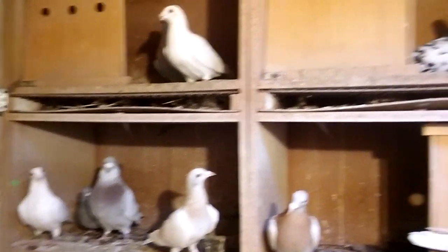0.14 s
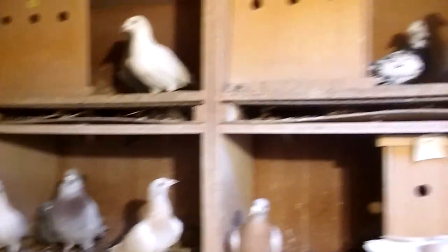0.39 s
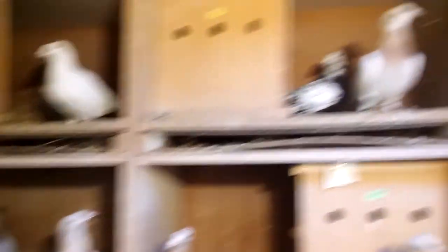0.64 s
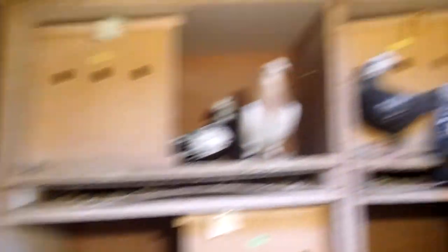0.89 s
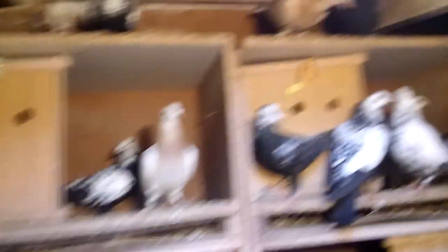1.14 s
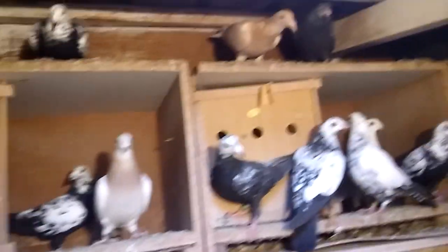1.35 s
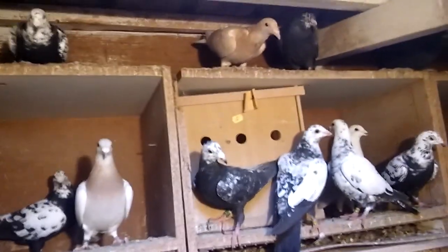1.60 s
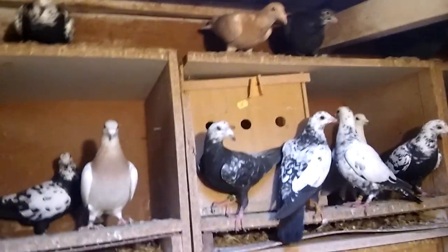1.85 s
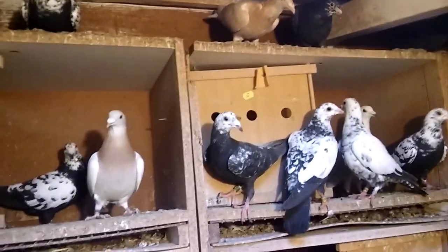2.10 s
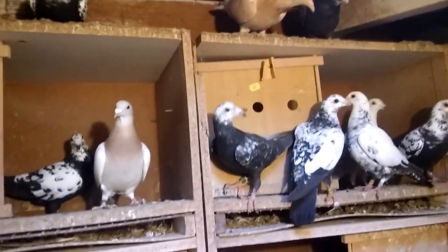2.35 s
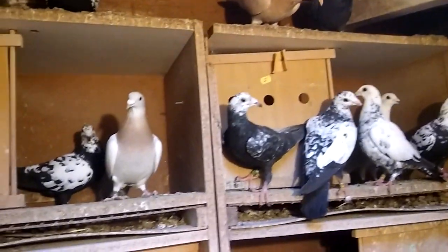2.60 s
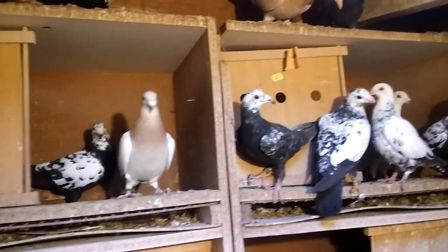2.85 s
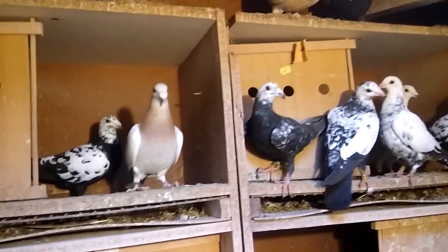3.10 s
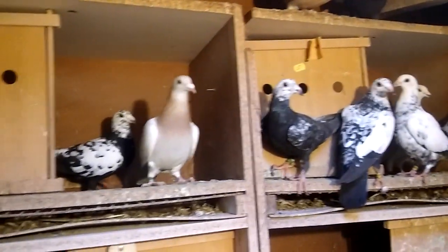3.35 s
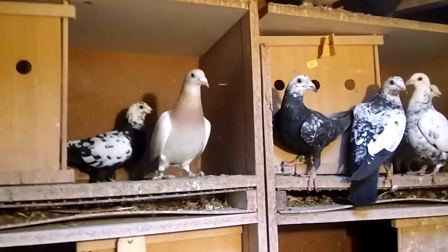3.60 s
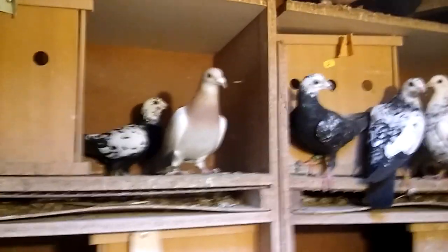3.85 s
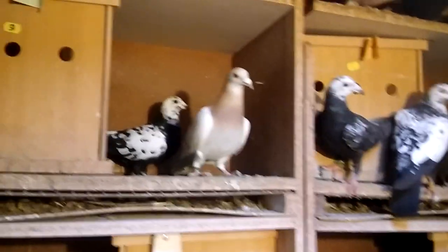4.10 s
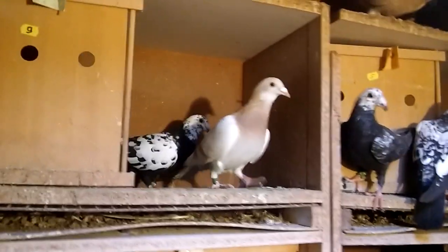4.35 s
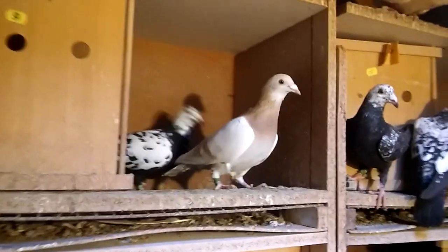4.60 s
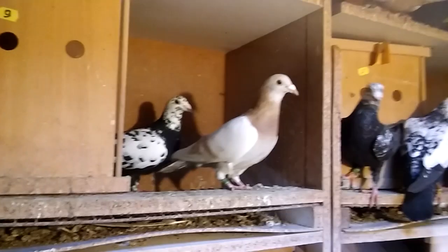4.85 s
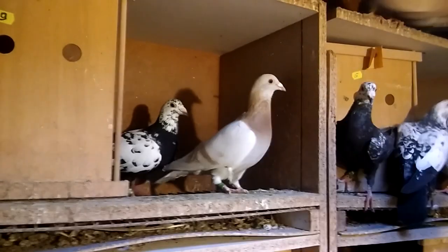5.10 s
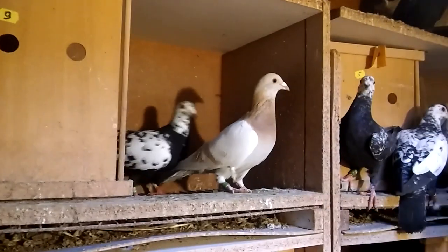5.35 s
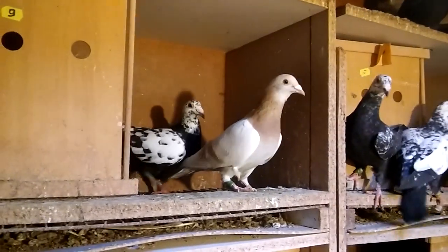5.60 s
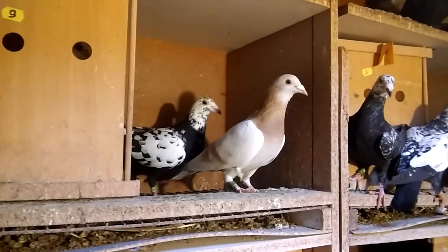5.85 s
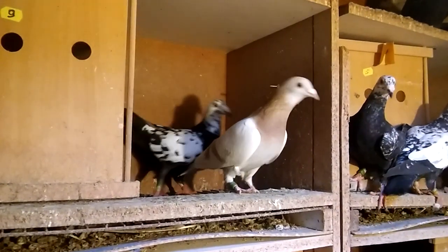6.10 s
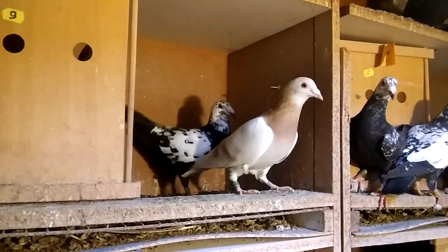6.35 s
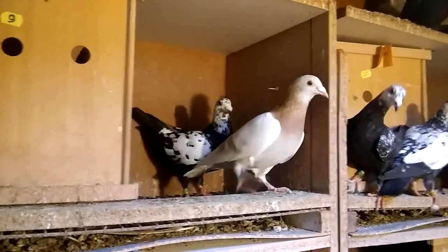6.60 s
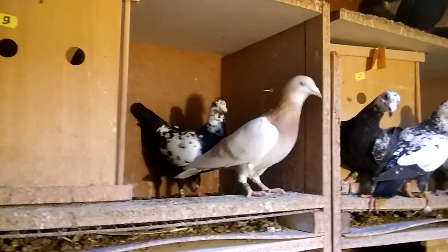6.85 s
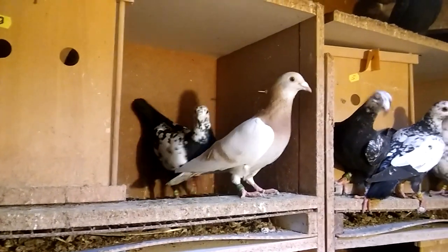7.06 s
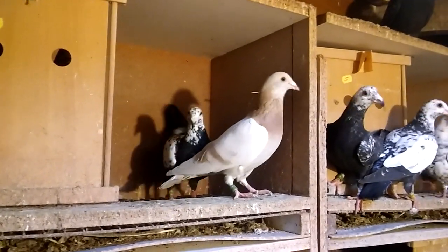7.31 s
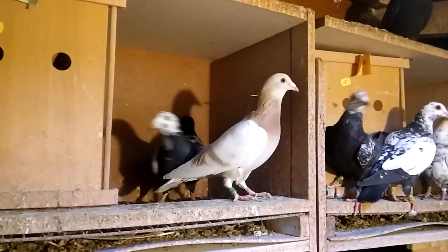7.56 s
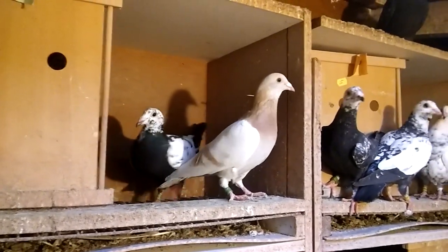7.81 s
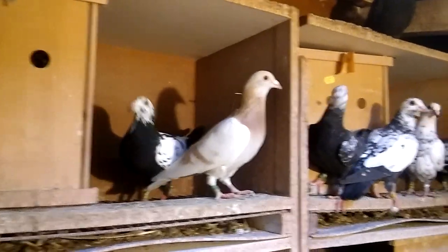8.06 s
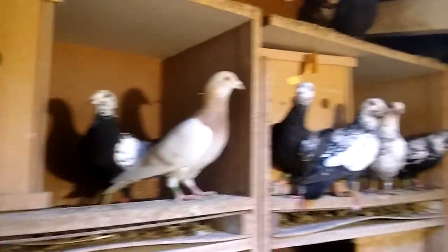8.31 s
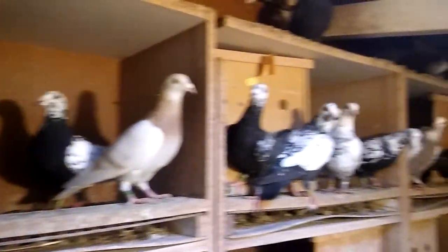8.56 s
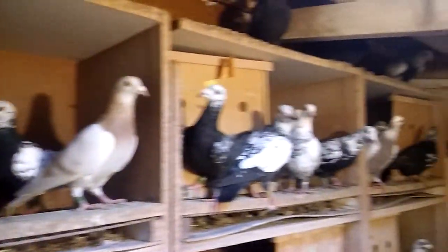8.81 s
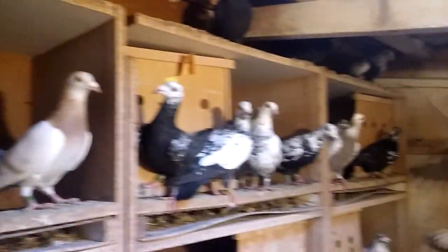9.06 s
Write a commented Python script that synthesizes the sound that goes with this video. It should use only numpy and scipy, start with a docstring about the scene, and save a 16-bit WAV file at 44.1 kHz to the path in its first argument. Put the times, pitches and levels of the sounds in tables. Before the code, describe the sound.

Claws tap and feathers rustle on wooden shelves with faint coos, a sudden heavy board clatter midway, another flutter, then near quiet.

```python
"""Pigeons in a small wooden loft. From the start, claws and wing tips tap and scuff on the boards as gritty
noise bursts, over birds stirring as wavering noise bands. Early on come a few soft coos, sung as gliding sines,
and a bird fluttering past in even low pulses. Midway a bird landing close by makes a loose board bang and
bounce as a set of ringing modes; a second flutter passes. Late on, distant hollow knocks ring."""
import sys
import numpy as np
from scipy import signal
from scipy.fft import rfft, irfft
from scipy.io import wavfile
from scipy.ndimage import uniform_filter1d, map_coordinates

SR = 44100
rng = np.random.default_rng(int(sys.argv[2]) if len(sys.argv) > 2 else 0)


def ratio_of_db(decibels):
    """Turn decibels (scalar or array-like) into linear amplitude factors; 0 dB maps to 1."""
    return 10 ** (np.asarray(decibels, float) / 20)


def inscribe(sig):
    """Save sig as 16-bit PCM at rate SR to the path in sys.argv[1].

    A 1-D sig is mono; a 2-D sig holds one channel per row.
    Samples are clipped to [-1, 1] before scaling.
    """
    pcm = np.round(np.clip(np.atleast_2d(sig).T, -1, 1) * 32767)
    wavfile.write(sys.argv[1], SR, pcm.astype(np.int16))


N = 405279

# taps and scuffs on the boards: (t/s, peak level/dB, treble level/dB re middle band, t60/s)
TAPS = [(0.073, -48.5, 1, 0.23), (0.297, -37.5, -2, 0.22), (0.347, -37.5, -7, 0.26),
        (0.379, -36.5, -6.5, 0.23), (0.4354, -40, 0, 0.27), (0.742, -45, 1.5, 0.31),
        (0.845, -44.5, -5, 0.12), (0.894, -53, 3, 0.8), (1.046, -37, 0, 0.14), (1.121, -51, 4, 0.13),
        (1.163, -34.5, -5.5, 0.18), (1.286, -37, 0, 0.46), (1.428, -23.5, 1.5, 0.15),
        (1.6397, -19, 2, 0.16), (1.747, -34, -4.5, 0.24), (2.0716, -41, 2, 0.16),
        (2.426, -53.5, -2.5, 0.81), (2.6447, -41, -7, 0.25), (2.734, -47.5, 6.5, 0.23),
        (2.803, -51, 9, 0.13), (2.868, -50.5, 2, 0.39), (2.925, -53.5, 10, 0.12), (3.101, -48, 4.5, 0.29),
        (3.315, -47, 2.5, 0.23), (3.352, -50.5, -3.5, 0.39), (3.48, -49, 4.5, 0.22), (3.529, -48, -4, 0.46),
        (3.599, -41, 5, 0.31), (3.734, -56, 9.5, 0.47), (3.872, -42, -1.5, 0.3), (3.9535, -51, 0, 0.39),
        (4.147, -56, 11, 0.41), (4.284, -54.5, 4.5, 0.56), (4.376, -53, 5, 0.38), (4.4706, -34, -1.5, 0.87),
        (4.7888, -24, -3, 0.035), (4.975, -30, -8, 0.25), (5.085, -32.5, -9, 0.048),
        (5.237, -33, -2.5, 0.044), (5.396, -25.5, -7, 0.29), (5.532, -22.5, -3, 0.17),
        (5.588, -25, -6, 0.18), (5.68, -29.5, -1.5, 0.13), (6.089, -31.5, -7, 0.14),
        (6.354, -40.5, 9.5, 0.13), (6.461, -43, -3.5, 0.67), (6.51, -49.5, 12, 0.08),
        (6.559, -39.5, -2, 0.42), (6.727, -40, -12.5, 0.095), (6.82, -36, 0.5, 0.25),
        (7.193, -53, 2.5, 0.4), (8.313, -51, -4, 0.23), (8.136, -63, 12, 0.29), (8.282, -60, 10, 0.35),
        (8.588, -69, 19, 0.29), (8.861, -55.5, 4, 0.6), (8.999, -31, 2, 0.19)]
TAP_BODY_DB, TAP_TINT_DB, FIRM_TAP_DB = -8, 5, -30
RISE_SHARE, SLOWER_RISE = 0.02, 0.12  # rise of a firm tap as a share of its t60; dB longer per dB fainter
AIRIER = 0.26  # dB more top treble per dB fainter: brushed feathers swish


def taps():
    """Each tap is a burst of gritty noise; long and faint ones are brushed and rise more slowly."""
    power, t = np.zeros((4, N)), np.arange(SR // 2) / SR
    for start, peak_db, treble_db, t60 in TAPS:
        at, fainter_db = int(start * SR), FIRM_TAP_DB - peak_db
        fade = ratio_of_db(peak_db - 8 - 60 * t / t60)  # noise peaks stand about 8 dB over its rms
        rise_s = RISE_SHARE * t60 * ratio_of_db(SLOWER_RISE * fainter_db)
        fade *= np.minimum(t / rise_s, 1)
        body_db = TAP_BODY_DB - 0.5 * treble_db + 0.15 * fainter_db
        air_db = treble_db - 12 + AIRIER * fainter_db
        band_gain = ratio_of_db(np.array([[body_db], [0], [treble_db], [air_db]]))
        power[:, at:at + len(t)] += (band_gain * fade[:N - at]) ** 2
    grit = ratio_of_db(drift(350))  # uneven contact within a scuff
    body, middle, treble, air = np.sqrt(power) * grit
    out = body * zone(180, 1500, TAP_TINT_DB) + middle * zone(1000, 4900, TAP_TINT_DB)
    return out + treble * zone(3500, 12000, TAP_TINT_DB) + air * zone(8500, 20000)


# claws catching on a shelf edge: (t/s, peak level/dB)
CLAWS = [(0.899, -51), (1.1225, -49), (1.2915, -41), (2.427, -48), (2.8695, -52)]


def claws():
    """A claw catches abruptly and grates in two bands of noise."""
    s, peak_db = np.transpose(CLAWS)
    return fading(click_train(s, ratio_of_db(peak_db)), 0.15) * (zone(1900, 3000) + zone(4900, 6800))


# blows on the loose board: (t/s, swing level/dB, ring level/dB, crack level/dB, pitch ratio of the ring);
# the ratio is higher where the board is held down
BLOWS = [(4.506, -26, -18, -19, 1.15), (4.512, -40, -21, -24, 1.19), (4.5774, -29, -36, -23, 1.05),
         (4.62, -40, -42, -34, 1.2), (4.7206, -32, -22, -26, .95), (4.723, -6, -21.5, -26, 1.08),
         (4.7346, -34.5, -26, -20.5, 1.2), (4.8245, -8, -7, -16, 1.0), (4.8278, -3, 0, -16, 1.03),
         (4.8318, -23, -10, -22, .97), (4.896, -33, -29, -36, 1.1), (4.915, -4.5, -23, -30, .86),
         (4.985, -20, -30, -43, .95)]
# board modes, the first its heavy swing: (f/Hz, level/dB, t60/s)
BOARD_MODES = [(61, -3.5, 0.083), (140, -5.5, 0.038), (270, -5.5, 0.027), (494, -11.5, 0.04),
               (776, -12.5, 0.025), (1080, -12.5, 0.032), (1360, -6, 0.018), (1690, -7.5, 0.022),
               (2050, -10.5, 0.016), (2700, -14, 0.015)]


def board():
    """Every blow swings the board away a moment later, rings its upper modes and cracks; a rattle trails."""
    s, swing_db, ring_db, crack_db, ratio = np.transpose(BLOWS)
    (swing_hz, swing_mode_db, swing_t60), *upper = BOARD_MODES
    out = -ring(click_train(s + 0.0035, ratio_of_db(swing_db + swing_mode_db)), swing_hz, swing_t60)
    luck_db = rng.normal(0, 2.2, (len(s), len(upper)))
    touch = signal.unit_impulse(SR // 10)
    for blow, at in enumerate((s * SR).astype(int)):
        for k, (hz, level_db, t60) in enumerate(upper):
            size = (-1) ** k * ratio_of_db(ring_db[blow] + level_db + luck_db[blow, k])
            out[at:at + len(touch)] += size * ring(touch, hz * ratio[blow], t60)
    clicks = click_train(s, ratio_of_db(crack_db))
    crack = fading(clicks, 0.024) * zone(2700, 20000)
    rattle = ratio_of_db(-10) * fading(clicks, 0.079) * zone(510, 20000)
    return out + crack + rattle


# birds flying past: (first downstroke t/s, time between strokes/s, strokes, level/dB over the stir)
FLIGHTS = [(1.283, 0.0994, 7, 9), (5.54, 0.112, 10, 5.5)]
BEAT_HZ, BEAT_RISE_S, BEAT_T60_S = 77, 0.032, 0.29
BEAT_SPREAD_DB, BEAT_SPREAD_S = 2.5, 0.006


def wing_beats():
    """Near-even strokes follow the stir's strength; each soft push of air swells and rings in the low mode."""
    strokes = [(first + apart * k, over_db) for first, apart, count, over_db in FLIGHTS
               for k in range(round(count))]
    s, over_db = np.transpose(strokes)
    luck = rng.standard_normal((len(s), 2))
    s = s + BEAT_SPREAD_S * luck[:, 0]
    stroke_db = stir_db()[(s * SR).astype(int)] + over_db + BEAT_SPREAD_DB * luck[:, 1]
    push = np.hanning(int(2 * BEAT_RISE_S * SR))
    pushes = np.convolve(click_train(s, ratio_of_db(stroke_db)), push / push.sum())[:N]
    swell = fading(pushes, BEAT_T60_S)
    pitch = BEAT_HZ * (1 + 0.056 * drift(8.9))
    return swell * np.sin(2 * np.pi * np.cumsum(pitch) / SR)


# coo notes and two faint squeaks: (t/s, length/s, f/Hz, level/dB at the height of the swell, roughness 0-1)
COOS = [(0.61, .07, 1570, -65, .95), (0.68, .12, 1670, -60.5, .95), (1.13, .14, 312, -55, .85),
        (1.235, .08, 305, -52, .9), (1.265, .07, 410, -47, 1), (1.35, .05, 400, -46, 1),
        (1.415, .06, 335, -39.5, .85), (1.47, .11, 345, -44, .9), (2.42, .1, 311, -64, .8),
        (2.65, .255, 298, -48, .3), (2.89, .11, 352, -52, .5)]
COO_SECOND_DB, COO_WAVER = -32, 0.055  # second harmonic; share of the pitch
COO_GURGLE_DB, COO_BREATH_DB, COO_THROAT_DB = 3, 0, -3  # for a fully rough call
# a smooth note swells for this share of its length; rough ones burst out
SWELL_SHARE, SWELL_DB, FADE_DB = 0.85, 14, 10
# a smooth note starts this share high, settles within a share of the swell, and turns up as it fades
SCOOP, SCOOP_SHARE, UPTURN = 0.26, 0.5, 0.07


def coos():
    """The swollen crop passes almost only the fundamental; rough calls waver, gurgle and carry air."""
    out, waver, throat = np.zeros(N), drift(50), zone(280, 750)
    for start, length, hz, peak_db, rough in COOS:
        t = np.arange(N) / SR - start
        swell = max(SWELL_SHARE * (1 - rough) * length, 0.01)
        level_db = peak_db + np.interp(t, [0, swell, length], [-SWELL_DB, 0, -FADE_DB])
        scoop = SCOOP * np.exp(-np.maximum(t, 0) / (SCOOP_SHARE * swell))
        upturn = np.interp(t, [swell, length], [0, UPTURN])
        pitch = hz * (1 + (1 - rough ** 2) * (scoop + upturn))
        pitch = pitch * (1 + rough * COO_WAVER * waver * (hz < 1000))  # high squeaks hold their pitch
        phase = 2 * np.pi * np.cumsum(pitch) / SR
        gurgle = ratio_of_db(rough * COO_GURGLE_DB * drift(45.56))  # the throat flutters unevenly
        breath = rough * ratio_of_db(COO_BREATH_DB) * np.tanh(drift(hz / 2))  # air noise widens the tone
        tone = (1 + breath) * np.sin(phase) + ratio_of_db(COO_SECOND_DB) * np.sin(2 * phase)
        air = rough ** 2 * ratio_of_db(COO_THROAT_DB) * throat
        ends = np.clip(np.minimum(t, length - t) / 0.005, 0, 1)
        out += np.sqrt(2) * ratio_of_db(level_db) * ends * gurgle * (tone + air)
    return out


# soft landings of feet on a shelf: (t/s, peak level/dB)
THUDS = [(2.906, -47), (3.033, -53)]
THUD_HZ, THUD_T60_S = 182, 0.45


def thuds():
    """Soft feet excite a band of dull low noise that jumps up and dies away."""
    s, peak_db = np.transpose(THUDS)
    level = fading(click_train(s, ratio_of_db(peak_db - 3)), THUD_T60_S)
    return level * zone(THUD_HZ / 1.4, THUD_HZ * 1.4)


# touches of a distant hollow knock: (t/s, level/dB)
HOLLOW = [(7.137, -57), (8.367, -58), (8.427, -49), (8.432, -45), (8.4425, -43)]
# its resonances: (f/Hz, level/dB, t60/s)
HOLLOW_MODES = [(1265, -7, 0.09), (1345, -1, 0.035), (1490, -7, 0.07), (1590, -8, 0.07), (835, -9, .04),
                (655, -10, .05)]


def hollow_knock():
    """Soft touches on something hollow and far; its echoes keep stirring the same resonances."""
    s, touch_db = np.transpose(HOLLOW)
    clicks = click_train(s, ratio_of_db(touch_db))
    echo_level = ratio_of_db(-38.5) * fading(clicks ** 2 / clicks.max(), 1.0)  # firm touches echo most
    stirred = clicks + rng.standard_normal(N) * echo_level
    rung = np.zeros(N)
    for k, (hz, level_db, t60) in enumerate(HOLLOW_MODES):
        rung += (-1) ** k * ratio_of_db(level_db) * ring(stirred, hz, t60)
    distance = signal.butter(3, [600, 1900], "band", fs=SR, output="sos")  # distance dulls it
    return signal.sosfilt(distance, rung)


# how busy the birds are: (t/s, level/dB)
STIR = [(0.0, -61.5), (0.87, -60), (1.53, -47.5), (1.87, -48), (2.15, -59.5), (2.46, -64.5), (2.79, -57.5),
        (4.301, -64), (4.53, -58), (4.68, -44.5), (4.89, -42), (5.17, -47.5), (5.4, -47.5), (5.78, -41.5),
        (6.52, -52), (6.91, -61), (7.98, -68.5), (8.45, -64.5), (8.97, -59), (9.19, -54.5)]


def stir_db():
    """The stir at every sample, in straight lines between the points."""
    return np.interp(np.arange(N) / SR, *np.transpose(STIR))


CALM_DB = -60  # a calm loft
# level settings, and the share of the stir's swing in dB that each follows
RUMBLE_DB, RUMBLE_FOLLOWS = -64, 1
RUSTLE_DB, RUSTLE_FOLLOWS = -66, 0.94
STRAW_DB, STRAW_FOLLOWS = -68, 0.78
TICKS_PER_S, SNAPS_PER_S = 8.5, 57


def stir():
    """Many birds shift and flap: rumble, lumpy flutter, feather rustle and brighter straw, each wavering."""
    busy_db = stir_db() - CALM_DB
    shared = 0.5 * drift(12)
    out = zone(30, 100) * ratio_of_db(RUMBLE_DB + RUMBLE_FOLLOWS * busy_db + 1.9 * shared)
    flutter = ratio_of_db(CALM_DB + 0.5 * shared + 1.2 * drift(70))
    low = zone(100, 270) * ratio_of_db(0.85 * busy_db - 5)
    middle = zone(270, 1100) * ratio_of_db(1.1 * busy_db - 3)
    out += flutter * (low + middle)
    # unseen feet; in a busy loft they merge into a steady rush
    feet = 1.9 * ratio_of_db(0.5 * np.maximum(busy_db, 0)) + grains(TICKS_PER_S, 0.092)
    rustle = zone(1400, 8000, 1.7) * (feet + grains(SNAPS_PER_S, 0.052)) / 3.73
    straw = zone(3500, 20000, 2) * (feet + 1.5 * grains(SNAPS_PER_S, 0.068)) / 3.88
    out += ratio_of_db(RUSTLE_DB + RUSTLE_FOLLOWS * busy_db + 2 * drift(25)) * rustle
    return out + ratio_of_db(STRAW_DB + STRAW_FOLLOWS * busy_db) * straw


def hiss():
    """Faint steady high noise."""
    return ratio_of_db(-80.5) * zone(14000, 20000)


def loft(x):
    """Dense wall reflections: a noise tail that dies away, starting after the first wall."""
    t60_s, level_db, first_wall_s = 0.23, -19.5, 0.006
    t = np.arange(SR // 2) / SR
    tail = rng.standard_normal(len(t)) * ratio_of_db(-60 * t / t60_s) * (t > first_wall_s)
    tail /= np.sqrt(np.sum(tail ** 2))
    return x + ratio_of_db(level_db) * signal.fftconvolve(x, tail)[:N]


# colour of the boards, the room and the microphone: (f/Hz, level/dB per Hz)
COLOUR = [(18, -43.5), (30, -3), (75, -1), (174, -5), (404, -7.5), (1130, -16), (2060, -9), (3140, -23),
          (4000, -21), (4780, -24.5), (5740, -18), (7870, -30), (9220, -26.5), (10200, -30.5),
          (14800, -30.5), (16000, -48)]


def zone(low_hz, high_hz, tint_db=0):
    """Fresh noise in one zone of the spectrum, shaped by the colour; rms 1."""
    hz = np.maximum(np.fft.rfftfreq(N, 1 / SR), 1)
    where, level_db = np.transpose(COLOUR)
    edges = 1 / np.sqrt((1 + (low_hz / hz) ** 8) * (1 + (hz / high_hz) ** 8))
    shape = ratio_of_db(np.interp(np.log(hz), np.log(where), level_db)) * edges
    noise = irfft(rfft(rng.standard_normal(N)) * shape, N)
    return rms_one(patchy(noise, tint_db))


def patchy(x, tint_db):
    """Each small contact rings at pitches of its own: random gains over cells of time and frequency."""
    fine_db = 3
    frames = signal.stft(x, nperseg=512)[2]
    cells = rng.standard_normal((130, 520))
    rows, columns = np.meshgrid(np.arange(frames.shape[0]) / 2, np.linspace(0, 519, frames.shape[1]),
                                indexing="ij")
    fine = map_coordinates(cells, [rows, columns], order=1)
    broad = map_coordinates(cells[::-1], [rows / 4, columns / 4], order=1)
    gain = ratio_of_db(fine_db * fine + tint_db * broad)
    return signal.istft(frames * gain, nperseg=512)[1][:N]


def rms_one(x):
    """Scale to rms 1."""
    return x / np.sqrt(np.mean(x ** 2) + 1e-20)


def drift(rate):
    """Slow chance: random knots of spread 1, rate of them a second, joined by straight lines."""
    knots = rng.standard_normal(int(N / SR * 400) + 2)
    return np.interp(np.arange(N) / SR * rate, np.arange(len(knots)), knots)


def click_train(times, sizes):
    """One click of a given size at each time."""
    out = np.zeros(N)
    out[(np.asarray(times) * SR).astype(int)] = sizes
    return out


def ring(clicks, hz, t60):
    """A two-pole resonator: a unit click sets a sine of height 1 ringing."""
    r, w = ratio_of_db(-60 / (t60 * SR)), 2 * np.pi * hz / SR
    return signal.lfilter([0, np.sin(w)], [1, -2 * r * np.cos(w), r * r], clicks + 1e-18)


def fading(clicks, t60):
    """A click becomes a level that jumps up and dies away."""
    return signal.lfilter([1], [1, -ratio_of_db(-60 / (t60 * SR))], clicks + 1e-18)


def grains(per_s, t60):
    """Chance contacts of uneven size, each a level that jumps and dies."""
    return fading((rng.random(N) < per_s / SR) * rng.exponential(1, N), t60)


def scene():
    """All sources over a faint steady high hiss, one channel; the walls answer the sharper ones."""
    echoing = loft(taps() + claws() + coos() + hollow_knock() + board())
    return (echoing + thuds() + wing_beats() + stir() + hiss())[None]


def roll_off(x):
    """The treble ends steeply here."""
    return signal.sosfilt(signal.butter(12, 17000, fs=SR, output="sos"), x)


def record(dry):
    """The microphone cuts the deepest bass; a suppressor lowers quiet moments; peaks clip; the top is cut."""
    x = signal.sosfilt(signal.butter(4, 42, "high", fs=SR, output="sos"), dry)
    level_db = 10 * np.log10(uniform_filter1d(x ** 2, size=1500) + 1e-12)
    suppress_db = 0.5 * np.clip(level_db + 54, -20, 0)  # half a dB down per dB under -54, at most 10
    x = np.clip(x * ratio_of_db(suppress_db), -0.9, 0.9)
    x = signal.sosfilt(signal.cheby2(10, 50, 16800, fs=SR, output="sos"), x)
    return roll_off(x)


dry = scene()
out = record(dry)
inscribe(out)
```